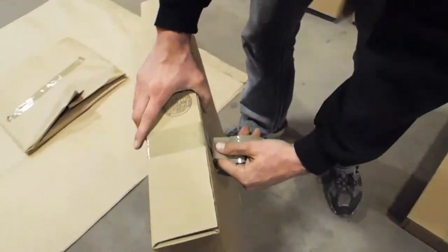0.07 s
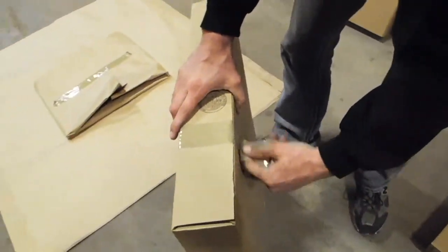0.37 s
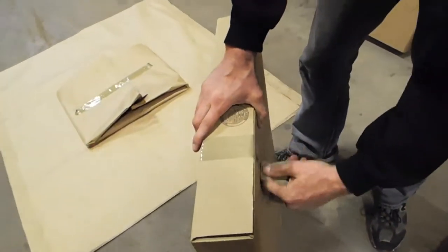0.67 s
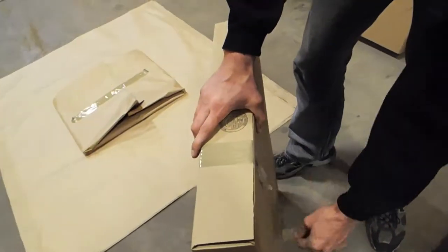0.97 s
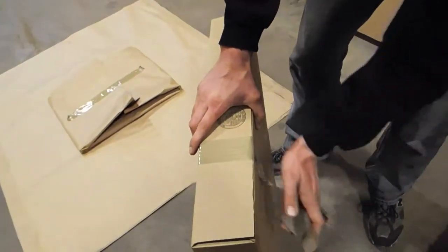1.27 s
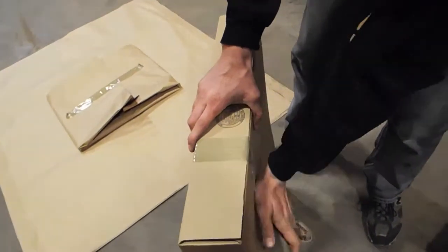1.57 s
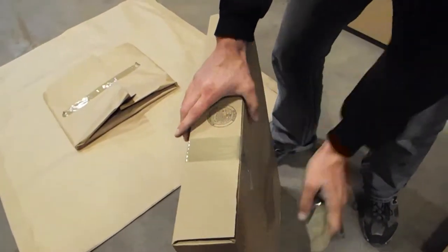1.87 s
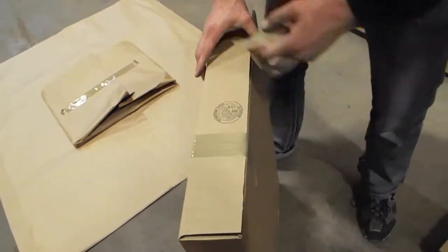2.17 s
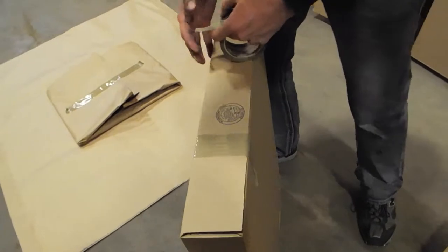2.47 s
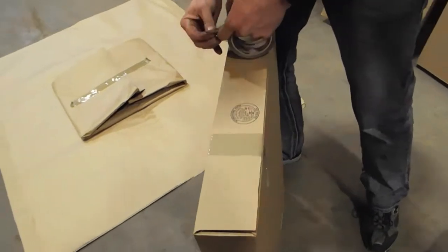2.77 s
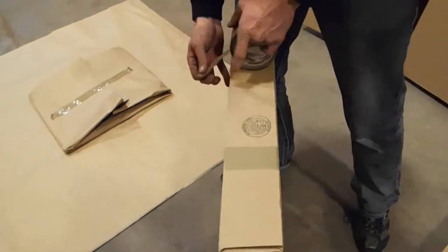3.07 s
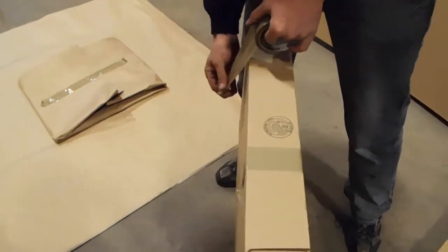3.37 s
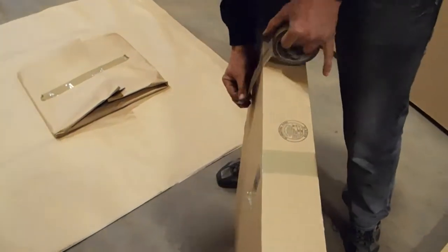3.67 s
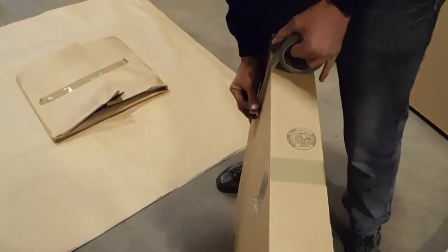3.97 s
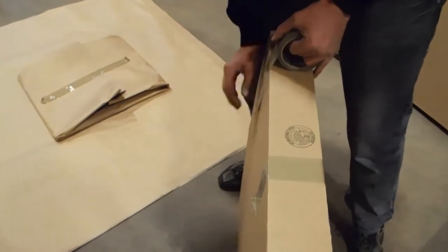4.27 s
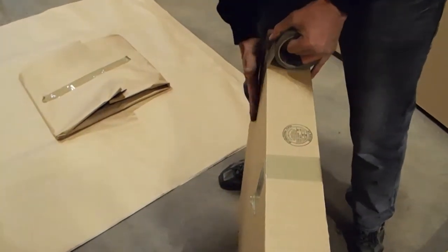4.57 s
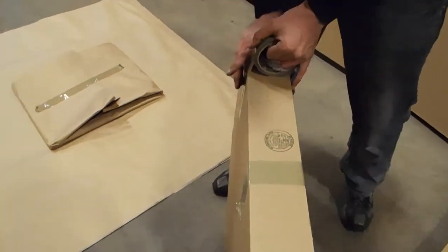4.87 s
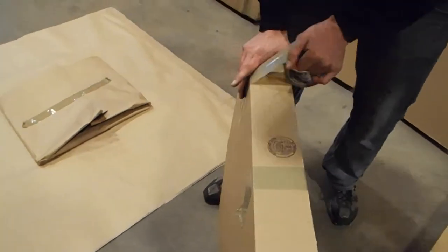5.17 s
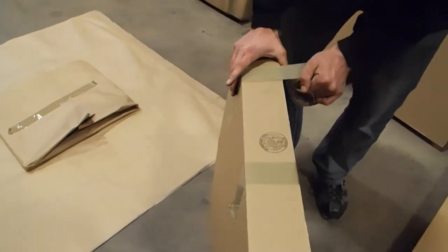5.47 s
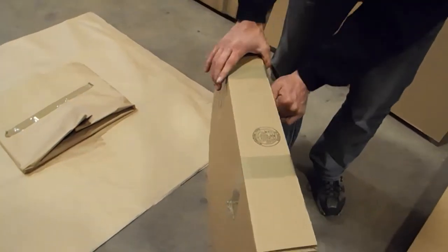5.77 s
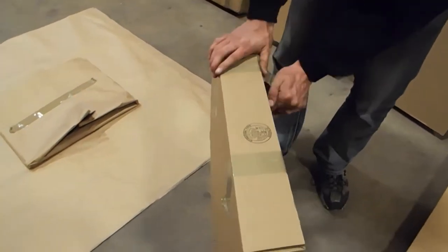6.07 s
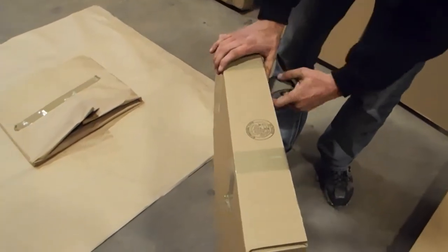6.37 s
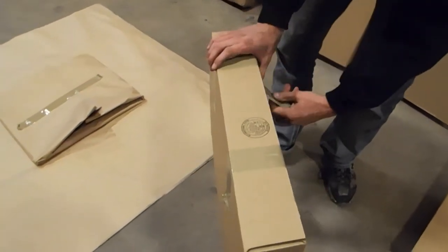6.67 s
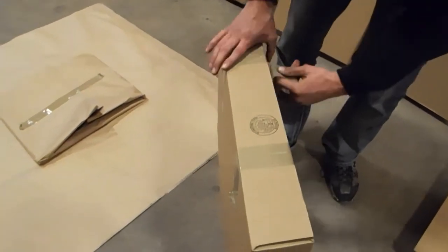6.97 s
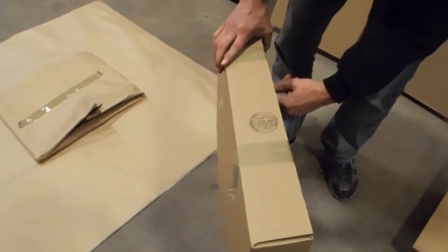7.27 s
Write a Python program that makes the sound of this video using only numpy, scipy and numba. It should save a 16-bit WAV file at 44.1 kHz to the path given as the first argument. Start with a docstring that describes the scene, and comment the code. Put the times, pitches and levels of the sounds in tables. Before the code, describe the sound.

A cardboard box is taped shut close to a stereo microphone in a bare workroom with a soft echo and faint hiss. In the first second, hands slide on the card, packing tape rasps in small tugs and the box booms hollowly, with a quick rip and a thump near 0.9 seconds. Quieter rubbing, soft knocks and an odd crackle follow until about 2.7. From 2.8 to 3.9 the tape comes off in short, bright tugs with sticky snaps. The box is knocked and thuds on the floor at 4.1 and 4.4. From 5 to 5.7 come the loudest snaps, briefly overloading the microphone, around one longer pull whose ringing tone sinks in pitch. A hand smooths the tape, with knocks at 5.8 and 6.1 and more crackles. A steady short rasp sounds from 6.5 to 6.8, then light rubbing until about 7.3 seconds.

```python
"""Taping a cardboard box

A bare workroom, a small stereo microphone close to the box. Packing tape comes off its roll in short
tugs, the glue letting go in dense tiny slips and single snaps; in one long draw the free strip rings,
lower as it lengthens. Hands smooth the tape down and knock the box, which booms. The walls answer
softly, and the microphone overloads on the sharpest snaps."""
import sys
import numpy as np
from scipy import signal
from scipy.fft import rfft, irfft, next_fast_len
from scipy.io import wavfile
from scipy.ndimage import uniform_filter1d
from numba import njit

SR = 44100
rng = np.random.default_rng(int(sys.argv[2]) if len(sys.argv) > 2 else 0)


def to_wav(s):
    """Save 16-bit WAV."""
    ch = np.atleast_2d(s).T  # columns
    pcm = np.round(np.clip(ch, -1, 1) * 32767)  # PCM
    wavfile.write(sys.argv[1], SR, pcm.astype(np.int16))


N = 323341
TIME = np.arange(N) / SR
SIZE = next_fast_len(N + 2 * SR, real=True)
FREQ = np.maximum(np.arange(SIZE // 2 + 1) * SR / SIZE, 1)


def undb(db):
    """Decibels to gain."""
    return 10 ** (np.asarray(db) / 20)


def unit(x):
    """Scale to rms 1."""
    return x / np.sqrt(np.mean(x ** 2))


def over_freq(points, column=1):
    """Join table rows by straight lines over log frequency."""
    points = np.array(points)
    return np.interp(np.log(FREQ), np.log(points[:, 0]), points[:, column])


def response(points):
    """Causal filter with the given spectrum that keeps the power of white noise."""
    cepstrum = irfft(np.log(undb(over_freq(points))), SIZE)
    cepstrum[1:SIZE // 2] *= 2
    cepstrum[SIZE // 2 + 1:] = 0
    gain = np.exp(rfft(cepstrum))
    return gain / np.sqrt(np.mean(np.abs(gain) ** 2))


def through(x, gain):
    """Pass a sound through a frequency response."""
    return irfft(rfft(x, SIZE) * gain, SIZE)[..., :N]


def add(track, start, sound):
    """Mix a short sound in at a time in seconds."""
    i = int(start * SR)
    track[i:i + len(sound)] += sound[:N - i]


def waver(hz):
    """Random wandering with rms 1, mostly slower than hz."""
    return unit(through(rng.standard_normal(N), np.exp(-FREQ / hz)))


def burst(t, decay_s):
    """A dying puff of noise with unit energy."""
    puff = rng.standard_normal(len(t)) * np.exp(-t / decay_s)
    return puff / np.linalg.norm(puff)


@njit
def resonate(x, hz, width_hz):
    """State-variable band-pass with a moving centre."""
    y, band_state, low_state = np.empty(len(x)), 0., 0.
    for i in range(len(x)):
        step, damping = np.tan(np.pi * hz[i] / SR), width_hz / hz[i]
        band = (band_state + step * (x[i] - low_state)) / (1 + step * (step + damping))
        band_state = 2 * band - band_state
        low_state += 2 * step * band
        y[i] = damping * band
    return y


def resonate_twice(x, hz, width_hz):
    """Two band-passes in a row for steeper skirts, scaled to rms 1."""
    return unit(resonate(resonate(x, hz, width_hz), hz, width_hz))


def slips(rate, spread_db, length_ms):
    """Stick and slip: tiny bursts at uneven intervals, each with its own size and grain."""
    count = 30000
    gaps, sizes = rng.gamma(2, .5, count), rng.standard_normal(count)
    at = (np.cumsum(gaps) * SR / rate).astype(int)
    power = np.bincount(at[at < N], undb(spread_db * np.minimum(sizes[at < N], 2)) ** 2, N)
    power = signal.lfilter([1], [1, -np.exp(-2e3 / (length_ms * SR))], power)
    return unit(np.sqrt(power) * rng.standard_normal(N))


def strokes(rows, swell_db, crest, release_s):
    """Treble, middle and bass gains: each stroke swells to a crest (share of its length) and eases."""
    gains = np.zeros((3, N))
    depths = np.broadcast_to(swell_db, len(rows))
    for (start, length, db, middle_db, bass_db, *_), depth in zip(rows, depths):
        t = np.arange(0, length + 6 * release_s, 1 / SR)
        arch = undb(np.interp(t / length, [0, crest, 1], [-depth, 0, -depth]))
        gate = np.exp(-np.maximum(t - length, 0) / release_s)
        for track, level_db in zip(gains, (db, db + middle_db, db + bass_db)):
            add(track, start, undb(level_db) * arch * gate)
    return gains


# The still workroom. Each row: frequency in Hz, relative level in dB.
AIR_SPECTRUM = [(15, -52), (25, 1.5), (175, -7), (256, -7.5), (326, -4.5), (476, -12.5), (818, -14),
                (1650, -14.5), (3430, -18), (3720, -8.5), (16000, -34.5)]
# Spells of thin hiss. Each row: start in seconds, end in seconds, level in dB.
HISS_SPELLS = [(0, 1.52, -52), (2.3, 1.7, -52), (4.7, 7.1, -59), (5.1, 6.15, -48), (6.95, 11, -54.5)]


def room_tone():
    """Quiet air all round the microphone, and a thin high hiss that wavers in level and pitch."""
    mid, side, noise = rng.standard_normal((3, N))
    air = through(mid + undb(-11.5) * side * np.array([[1], [-1]]), response(AIR_SPECTRUM))
    swell = undb(2 * waver(hz=6))
    hiss = resonate_twice(noise, 4450 + 90 * waver(hz=6), width_hz=900.)
    fade_s = .1
    spells = sum(undb(db) * np.clip(np.minimum(TIME - start, end - TIME) / fade_s, 0, 1)
                 for start, end, db in HISS_SPELLS)
    return undb(-53.5) * air + spells * swell * hiss


# The box's modes. Each row: frequency in Hz, relative level in dB, seconds to fall 60 dB.
BOX_RESONANCES = [(115, 0.5, 0.065), (162, -0.5, 0.23), (221, -4, 0.2), (279, 7, 0.039), (322, 5.5, 0.095),
                  (378, -10.5, 0.23), (407.4, -11.5, 0.17), (551, 0, 0.03)]


def box_response():
    """The panels and the air inside ring as damped modes: a filter with unit energy."""
    t = TIME[:SR // 2]
    ring = sum((-1) ** k * undb(db - 60 * t / t60) * np.sin(2 * np.pi * hz * t)
               for k, (hz, db, t60) in enumerate(BOX_RESONANCES))
    return rfft(ring / np.linalg.norm(ring), SIZE)


# The hiss of a hand and the scrape of card, from close by. Each row: frequency in Hz, relative level in dB.
RUB_SPECTRUM = [(900, -39), (1500, -1.5), (2000, 0), (2900, 3), (3600, 3.5), (5700, 10), (7500, 1.5),
                (10000, -9.5), (14500, -18.5), (16000, -59)]
SCRAPE_SPECTRUM = [(200, -26.5), (500, 9.5), (850, 15), (1100, 11.5), (1400, 10), (2200, -73), (3200, 5),
                   (7000, -23)]
# Hands and sleeves sliding on card and tape. Each row: start and length in seconds, relative hiss
# level in dB, then offsets from it for card scrape and box boom in dB.
HAND_RUBS = [(0.0, 0.056, -44.5, -4, -14), (0.075, 0.093, -34, -12.5, -8.5), (0.195, 0.092, -39, -7.5, -4),
             (0.675, 0.064, -40.5, -12.5, -15), (0.935, 0.074, -33.5, -19, -4.5),
             (1.49, 0.084, -51, -1, 10.5), (1.6, .18, -44, -8, 1), (1.84, 0.071, -49, -4, 12),
             (2.175, 0.019, -47, -2.5, 12.5), (2.24, 0.043, -53, -17, -1), (2.62, 0.077, -42.5, -5.5, -21),
             (2.7, 0.11, -51.5, -6, -15), (4.255, 0.047, -54.5, -8, -12), (4.53, 0.093, -46, -19, -2),
             (4.655, 0.041, -49, -10, -4), (5.13, 0.063, -37.5, -15.5, -0.5), (5.672, 0.089, -33, -4, -13),
             (5.76, 0.13, -45.5, 3.5, 6.5), (5.87, 0.17, -55.5, 9.5, 9), (6.125, 0.062, -37, -6.5, 7.5),
             (6.22, 0.16, -52.5, -2, 9.5), (6.94, 0.29, -51.5, -4, 6), (7.13, 0.076, -53.5, -29, -29),
             (7.235, 0.067, -39.5, -10.5, -15)]


def rubbing(box):
    """Skin and cloth drag over the fibres of the card."""
    grain = slips(rate=800, spread_db=3.5, length_ms=1.0)
    high, middle, low = strokes(HAND_RUBS, swell_db=6.5, crest=.41, release_s=.019)
    hiss = through(grain * high, response(RUB_SPECTRUM))
    scrape = through(grain * middle, response(SCRAPE_SPECTRUM))
    boom = through(grain * low, box)
    return undb(4) * hiss + undb(-.5) * scrape + undb(-4.5) * boom


# The slap of card. Each row: frequency in Hz, relative level in dB.
SLAP_SPECTRUM = [(200, -35), (550, -21), (740, -4), (1000, -15), (1330, -9), (2200, -17), (6000, -12.5),
                 (15000, -43)]
# Hands striking the box. Each row: start in seconds, relative level in dB, slap offset in dB.
HAND_KNOCKS = [(0.062, -29.5, -15.5), (0.359, -22, -24.5), (0.491, -23, -23), (0.899, -20.5, -15),
               (0.925, -21, -24), (1.484, -32.5, -20), (1.693, -31, -19), (1.892, -36.5, -33),
               (2.184, -39.5, -17), (4.138, -25, -18), (4.42, -26.5, -21.5), (4.444, -22.5, -18.5),
               (5.061, -27.5, -30), (5.764, -24, -20), (6.122, -26, -21)]
# The box rocking on the floor. Each row: start in seconds, level in dB, pitch in Hz.
FLOOR_THUDS = [(0.907, -28, 53), (4.147, -34, 98), (4.418, -36.5, 79.4), (4.448, -23.5, 83),
               (7.048, -36, 77)]


def knocks():
    """Each knock booms the panels in its own mix while the card slaps; the box also thuds on the floor."""
    t = TIME[:SR // 3]
    boom, slap = np.zeros((2, N))
    hz, mode_db, t60 = np.transpose(BOX_RESONANCES)[..., None]
    for start, db, slap_db in HAND_KNOCKS:
        # the hand's place weights the modes and its grip detunes them
        place, grip = rng.standard_normal((2, len(hz), 1))
        envelopes = np.sign(place) * undb(mode_db + 2 * place - 60 * t / t60)
        ring = np.sum(envelopes * np.sin(2 * np.pi * hz * (1 + .019 * grip) * t), axis=0)
        add(boom, start, undb(db + 19) * ring / np.linalg.norm(ring))
        add(slap, start, undb(db + slap_db) * burst(t, decay_s=.017))
    for start, db, thud_hz in FLOOR_THUDS:
        add(boom, start, undb(db) * np.sin(2 * np.pi * thud_hz * t) * np.exp(-t / .016))
    return boom + undb(33) * through(slap, response(SLAP_SPECTRUM))


# The glue's rasp and the strip's flutter. Each row: frequency in Hz, relative level in dB.
RASP_SPECTRUM = [(880, -38), (1500, -4), (1830, -6.5), (2210, -5), (3030, -6), (4120, 1.5), (5330, 5),
                 (7760, -3.5), (10300, -12.5), (11300, -18), (14500, -16), (16000, -26.5)]
FLUTTER_SPECTRUM = [(150, -24), (400, 2.5), (600, 4.5), (900, 11), (1500, 14), (2200, 15), (3200, -10.5),
                    (7000, -39)]
# Short pulls on the roll, near the microphone. Each row: start and length in seconds, relative rasp
# level in dB, offsets from it for flutter and boom in dB, swell in dB, pitch of the taut film in Hz.
TAPE_TUGS = [(0.313, 0.17, -38.5, -8.5, -7.5, 1, 3670), (0.497, 0.03, -36, -8.5, 1.5, 8.5, 3500),
             (0.568, 0.04, -32.5, -5, -4.5, 7, 3900), (0.618, 0.049, -36.5, -7.5, -10, 5, 3450),
             (0.778, 0.076, -31, -13, -4, 15.5, 4800), (0.862, 0.076, -16, -7.5, -7, 25, 5250),
             (2.985, 0.02, -20.5, -12, -40, 10.5, 3550), (3.035, 0.03, -25, -13, -33, 2.5, 4640),
             (3.179, 0.073, -26, -16, -30, 8.5, 4200), (3.31, 0.067, -25, -13, -28, 4.5, 4580),
             (3.576, 0.033, -31, -6.5, -34, 0, 4540), (5.023, 0.024, -22, -8, -20, 3.5, 4330),
             (6.491, 0.29, -26.5, -10.5, -11, 2, 5070)]


def tugs(rasp, box):
    """The peel line rasps and rings the taut film; the same slips shake the strip and the box."""
    glue = slips(rate=1150, spread_db=2.8, length_ms=.65)
    swells_db = [swell for *_, swell, _ in TAPE_TUGS]
    high, middle, low = strokes(TAPE_TUGS, swells_db, crest=.648, release_s=.0097)
    film_hz = film_pitch()
    # rarer slips pluck the film
    plucks = slips(rate=650, spread_db=2.5, length_ms=.6)
    film = resonate_twice(plucks, film_hz, width_hz=1700.)
    peel = unit(through(glue, rasp) + undb(-1.5) * film)
    flutter = through(glue * middle, response(FLUTTER_SPECTRUM))
    boom = through(glue * low, box)
    return undb(5) * high * peel + flutter + undb(-1.5) * boom


def film_pitch(slack_hz=3300., tighten_share=.27):
    """The film's resonance rises from slack to taut early in every tug, and trembles slightly."""
    hz = np.full(N, slack_hz)
    for start, length, *_, taut_hz in TAPE_TUGS:
        i = int(start * SR)
        tension = np.minimum(TIME[:N - i] / (tighten_share * length), 1) ** 2
        hz[i:] = slack_hz + (taut_hz - slack_hz) * tension
    return hz * np.exp(.06 * waver(hz=25))


# Snaps of glue and taut film, sharp at this distance. Each row: start in seconds, relative level in dB,
# ring pitch in Hz, crackle offset in dB.
GLUE_SNAPS = [(0.341, -27, 5370, -13), (1.4628, -30.5, 5000, 8), (1.832, -37.5, 3530, -2.5),
              (2.4215, -40, 4400, -12), (2.851, -22, 5350, -15), (2.9, -33, 4200, -2),
              (2.909, -18.5, 5000, -2), (2.941, -37, 5000, 3), (2.966, -23.5, 3580, 5.5),
              (2.981, -20.5, 3840, -16), (2.987, -22.5, 3700, 5), (3.039, -25.5, 3900, 2),
              (3.2741, -34.5, 4560, 12.5), (3.676, -29, 3820, 6), (3.869, -31, 4070, 7.5),
              (4.137, -44.5, 5450, 15.5), (4.9411, -25.5, 4750, -10.5), (5.0623, -14, 4670, -14),
              (5.0854, -14.5, 4200, -4.5), (5.2, -4.5, 5240, -10.5), (5.247, -19.5, 4900, -6.5),
              (5.267, -17.5, 5400, -2), (5.2909, -17, 5430, -11), (5.325, -16.5, 4240, -1.5),
              (5.37, -18.5, 3940, 1.5), (5.5658, -9, 3610, -24), (5.6257, -12.5, 4450, -9.5),
              (5.7338, -24, 3040, -3), (5.7888, -25.5, 2710, -2.5), (5.8874, -35, 3170, -2),
              (6.069, -29.5, 2850, 2), (6.1199, -17.5, 4750, -11), (6.134, -31, 4130, 6.5),
              (6.16, -26.5, 4440, 4.5), (6.1806, -19.5, 4860, -3), (7.134, -40.5, 4140, 3),
              (7.242, -33.5, 3260, -31)]


def snaps(rasp):
    """A patch of glue lets go: the film clicks and rings for a few cycles, then crackles briefly."""
    t = TIME[:SR // 15]
    film, glue, card = np.zeros((3, N))
    for start, db, hz, crackle_db in GLUE_SNAPS:
        ring = np.sin(2 * np.pi * hz * t) * t * np.exp(-t / .00013)
        add(film, start, undb(db) * ring / np.linalg.norm(ring))
        crackle = undb(crackle_db) * burst(t, decay_s=.0063)
        click = undb(-9) * burst(t, decay_s=.0011)
        add(glue, start, undb(db) * (crackle + click))
        # a larger patch rings lower and cracks louder, by 37 dB an octave
        crack = undb(-13.5 + 37 * np.log2(4130 / hz)) * burst(t, decay_s=.0043)
        card_crackle = undb(crackle_db - 18.5) * burst(t, decay_s=.015)
        add(card, start, undb(db) * (crack + card_crackle))
    card = through(card, response(SCRAPE_SPECTRUM))
    return undb(22.5) * film + undb(24.5) * through(glue, rasp) + undb(14) * card


def squeak(at_s=3.79, half_length_s=.04, hz=4680.):
    """The stretched film squeaks once, faintly, as it slides over the edge of the box."""
    tone = unit(resonate(rng.standard_normal(N), np.full(N, hz), width_hz=57.))
    return undb(-47) * tone * np.exp(-((TIME - at_s) / half_length_s) ** 2)


# One long pull over the box's edge. Each row: time in seconds, relative rasp and ring levels in dB.
DRAW_LEVELS = [(5.197, -66, -57), (5.255, -64, -39), (5.36, -35, -39.5), (5.38, -24, -36.5),
               (5.448, -30, -37.5), (5.566, -51, -44)]
# The free strip's sinking note. Each row: time in seconds, base pitch in Hz.
STRIP_GLIDE = [(5.2, 592), (5.27, 566), (5.33, 477), (5.4, 456), (5.55, 466), (5.8, 419)]
# The strip's modes. Each row: multiple of the base pitch, width in Hz, relative level in dB.
STRIP_RESONANCES = [(.96, 75, -4), (1.92, 100, 0), (3.0, 85, 3), (4.0, 200, -5), (5.0, 180, -2.5)]


def long_draw(rasp, snapping):
    """Fast, even peeling; slips and snaps ring the lengthening strip, whose tension trembles."""
    times, rasp_db, ring_db = np.transpose(DRAW_LEVELS)
    gate = uniform_filter1d(1. * ((TIME > times[0]) & (TIME < times[-1])), SR // 100)
    glue = slips(rate=1100, spread_db=3, length_ms=.8)
    pitch = np.interp(TIME, *np.transpose(STRIP_GLIDE)) * (1 + .015 * waver(hz=50))
    drive = gate * (glue * undb(np.interp(TIME, times, ring_db)) + undb(-18) * snapping)
    ring = sum(undb(db) * resonate(drive, multiple * pitch, float(width))
               for multiple, width, db in STRIP_RESONANCES)
    peel = through(gate * glue * undb(np.interp(TIME, times, rasp_db)), rasp)
    return undb(-2) * peel + undb(22) * ring


# The bare workroom's decay. Each row: frequency in Hz, seconds to fall 60 dB.
WALL_DECAY = [(100, 0.95), (400, 1.68), (1200, 1.6), (4500, 0.69), (8000, 0.78), (15000, 0.46)]


def room_echo(sound):
    """Early returns from box and floor, then a long soft tail from the bare walls."""
    t = TIME[:SR]
    bins_hz = np.maximum(np.arange(SR // 2 + 1), 1)
    noise = rfft(rng.standard_normal((3, SR)))
    centres, t60s = np.transpose(WALL_DECAY)
    tail = 0
    for share, t60 in zip(np.eye(len(centres)), t60s):
        band = irfft(noise * np.interp(np.log(bins_hz), np.log(centres), share), SR)
        tail = tail + band * undb(-60 * t / t60)
    early = undb(-37) * rng.standard_normal((3, SR)) * np.exp(-t / .007) * (t > .002)
    late = undb(-45) * tail * (1 - np.exp(-t / .0092))
    left, right, common = rfft(early + late, SIZE)
    # the microphone's ports are close together, so mainly short waves differ between them
    apart = np.minimum(FREQ / 7000, 1)
    return through(sound, apart * np.array([left, right]) + np.sqrt(1 - apart ** 2) * common)


# The microphone's two ports. Each row: frequency in Hz, left minus right in dB, left's lead in radians.
MIC_PORTS = [(150, 2.2, 0), (1000, 2.2, -.26), (2300, 4, -.35), (3300, 5, -.5), (4400, 4.5, -1.3),
             (5400, 2.2, -1.7), (7500, 0, -1.6), (10300, -.5, -1.7), (15000, -1, -1.9)]


def scene():
    """Tape, hands and box in the workroom, as they reach the close stereo microphone."""
    rasp, box = response(RASP_SPECTRUM), box_response()
    snapping = snaps(rasp)
    handling = tugs(rasp, box) + long_draw(rasp, snapping) + rubbing(box) + knocks() + squeak()
    # the flat film beams its snaps upward, so the walls get less of them
    echo = room_echo(handling + undb(-1) * snapping)
    balance_db, lead = over_freq(MIC_PORTS), over_freq(MIC_PORTS, column=2)
    ports = np.array([undb(balance_db / 2) * np.exp(1j * lead), undb(-balance_db / 2)])
    return through(snapping + handling + echo + room_tone(), ports)


def record(dry):
    """This close, the sharpest snaps overload the converter; the top is cut at 15.9 kHz."""
    low_pass = signal.ellip(8, .2, 70, 15900, fs=SR, output="sos")
    return signal.sosfilt(low_pass, np.clip(dry, -1, 1))


dry = scene()
out = record(dry)
to_wav(out)
```